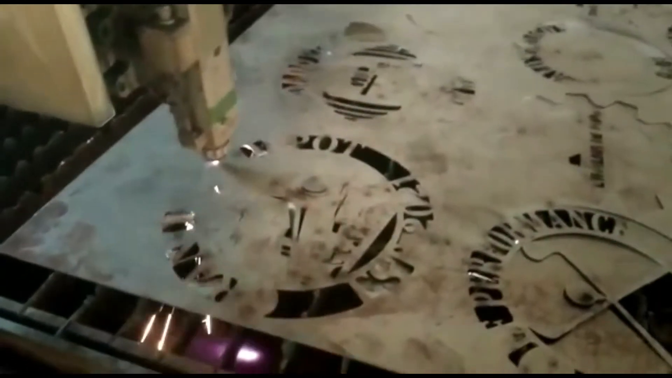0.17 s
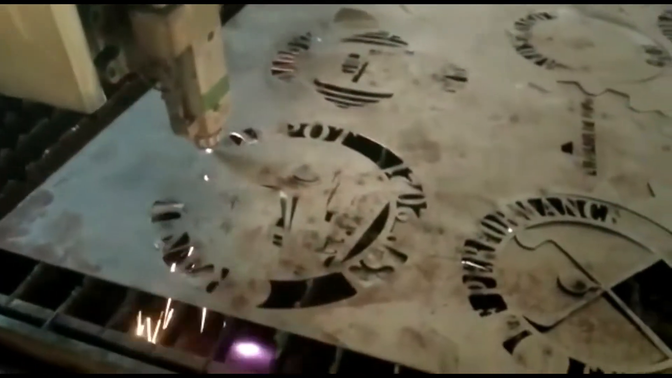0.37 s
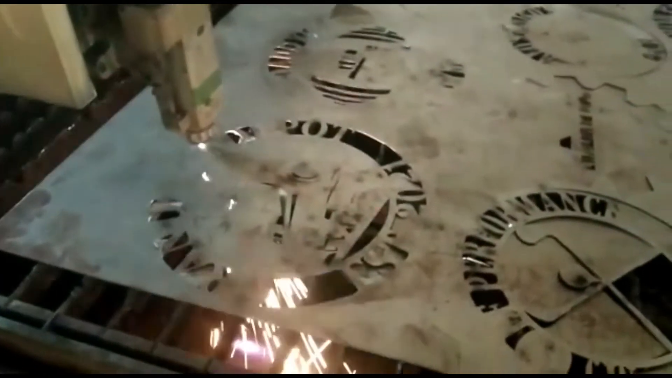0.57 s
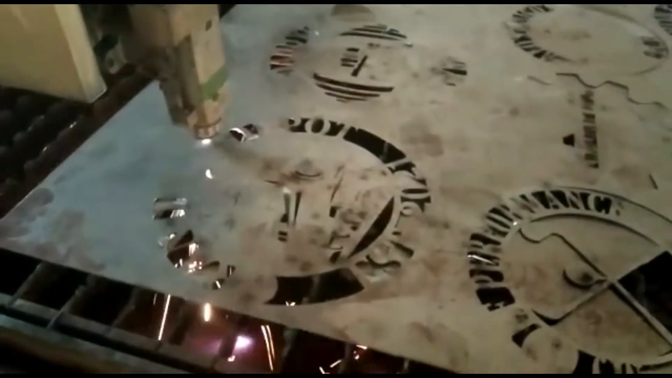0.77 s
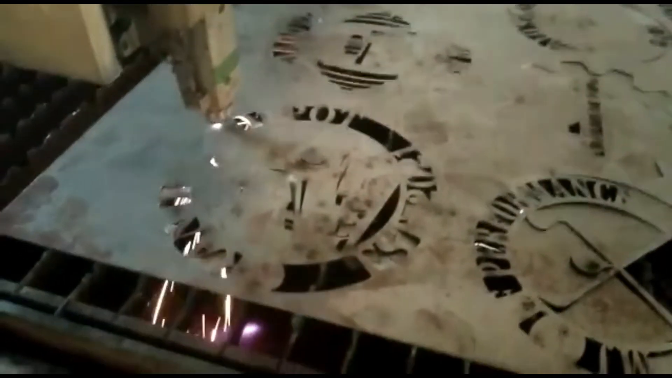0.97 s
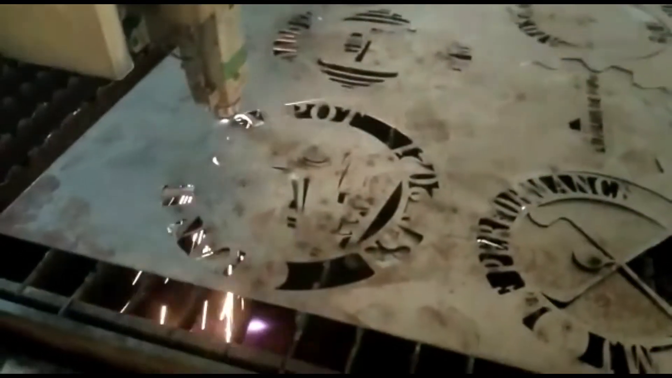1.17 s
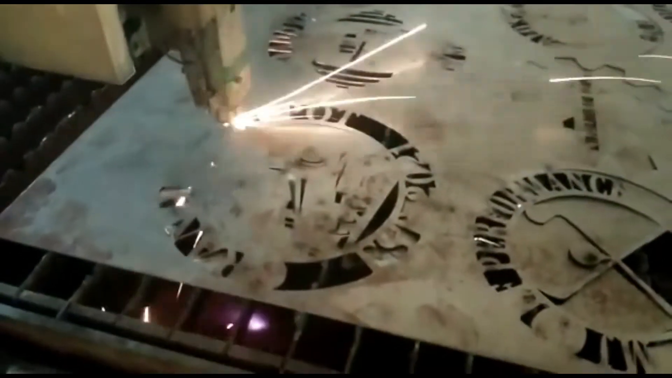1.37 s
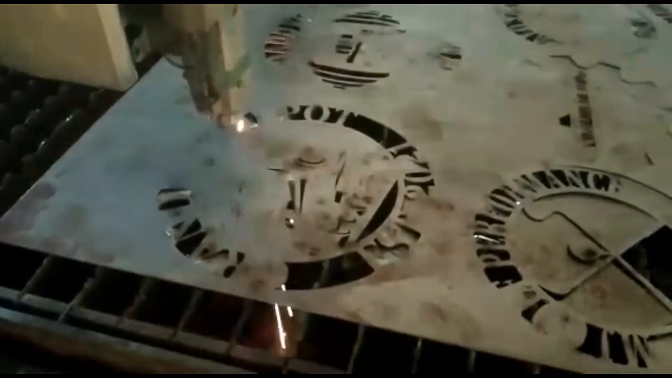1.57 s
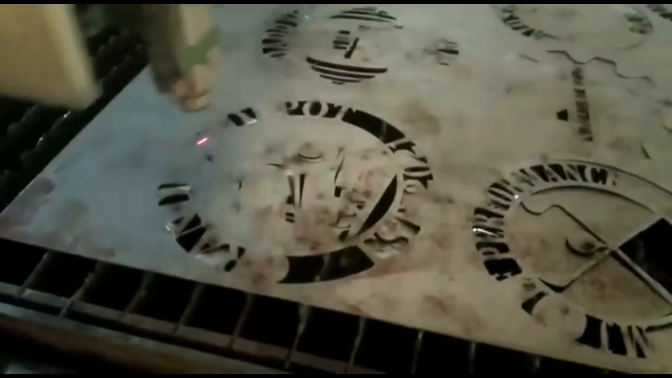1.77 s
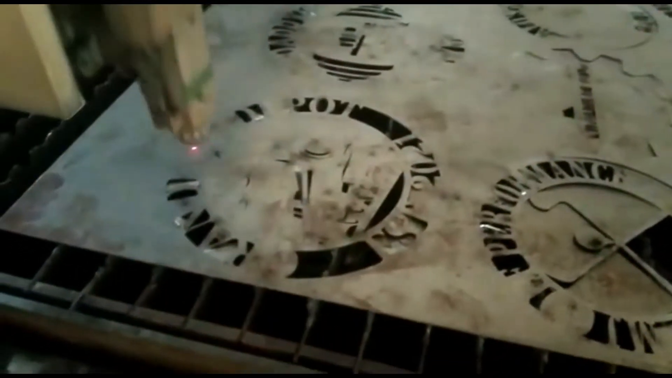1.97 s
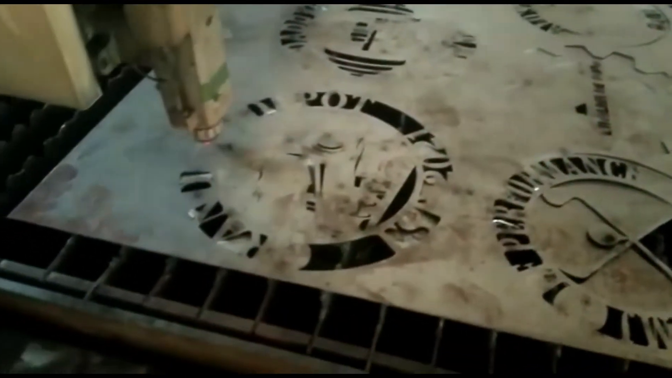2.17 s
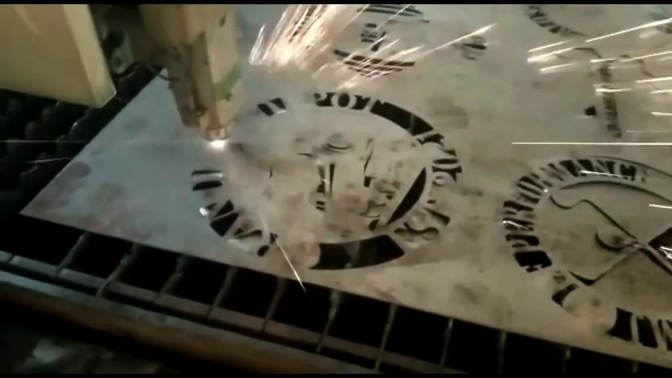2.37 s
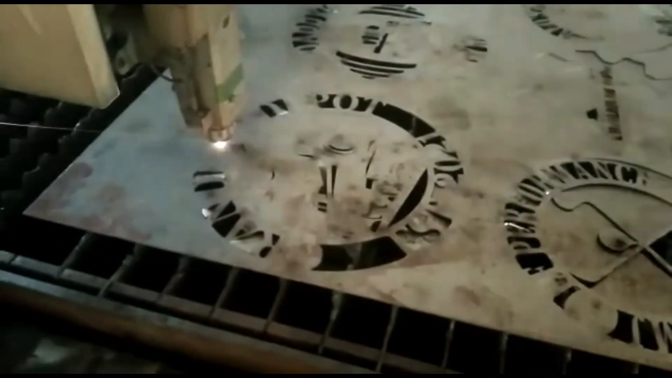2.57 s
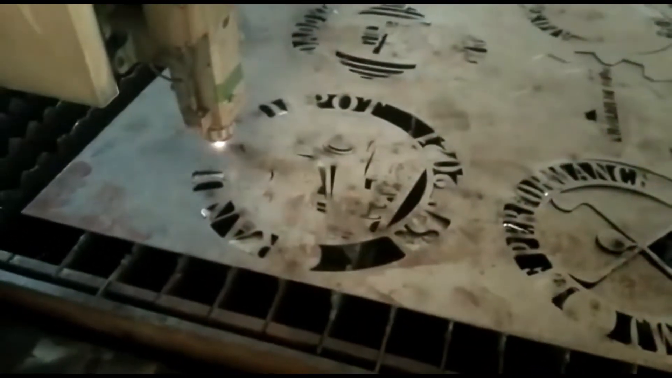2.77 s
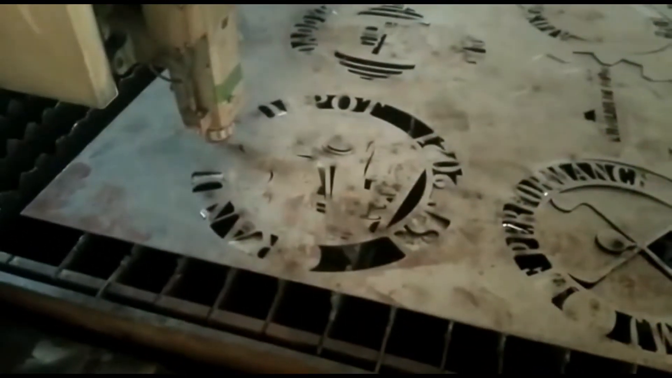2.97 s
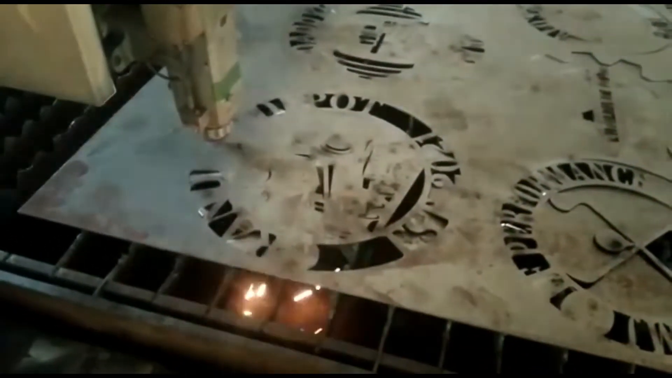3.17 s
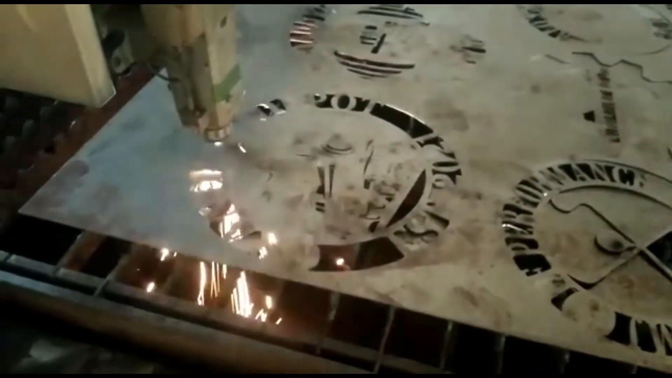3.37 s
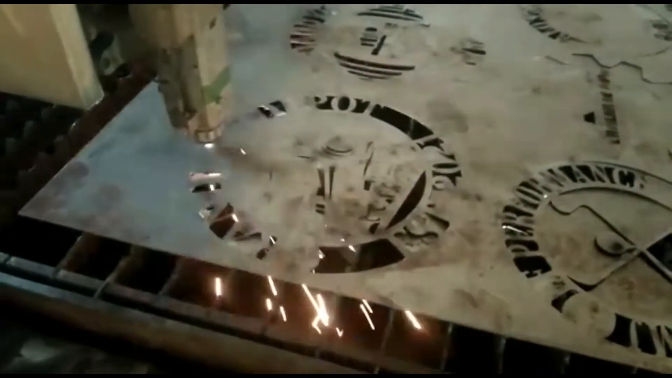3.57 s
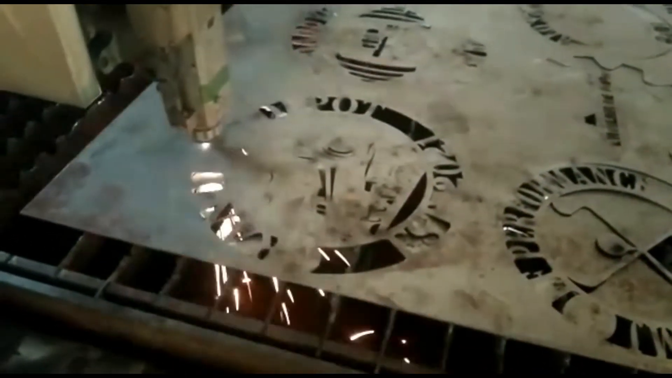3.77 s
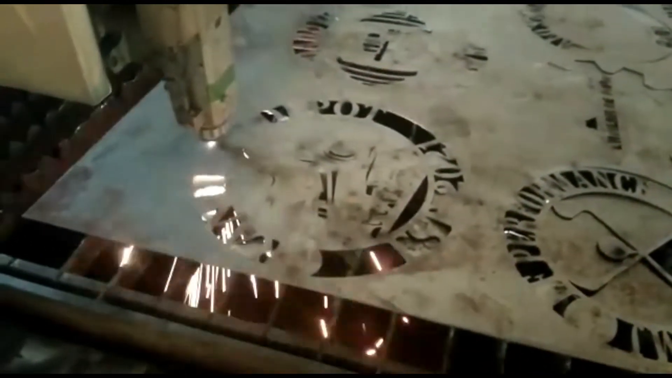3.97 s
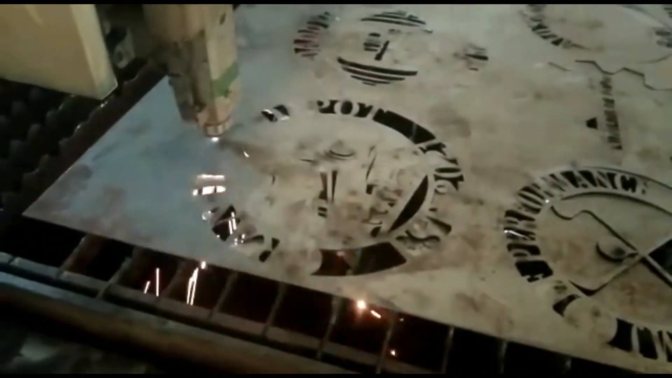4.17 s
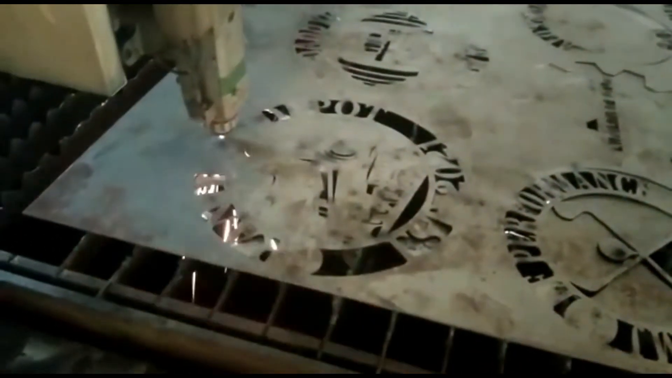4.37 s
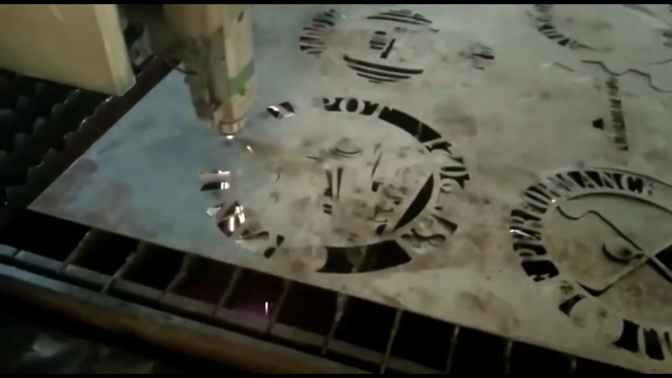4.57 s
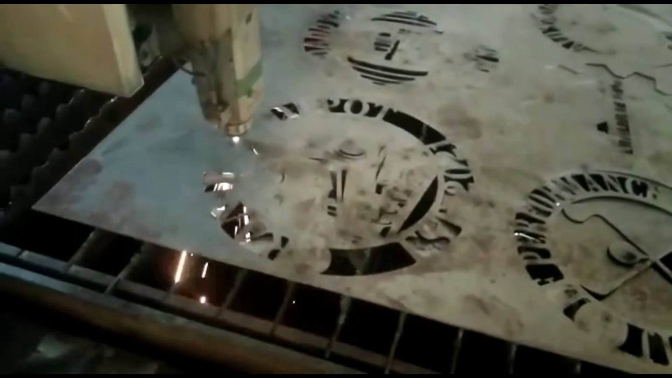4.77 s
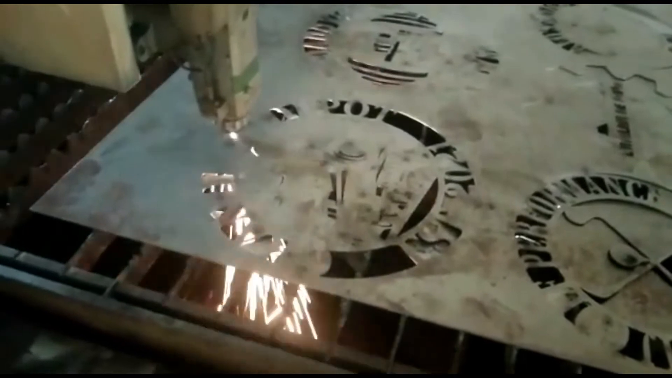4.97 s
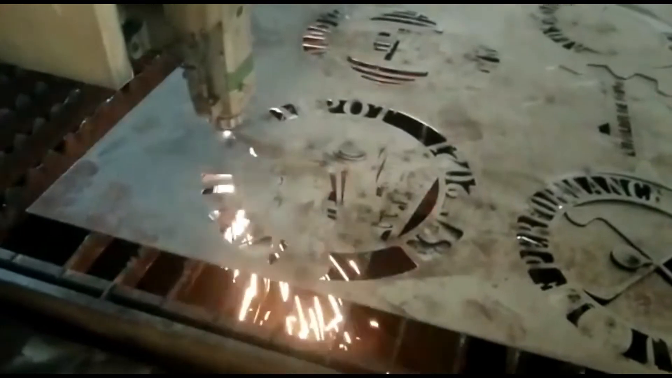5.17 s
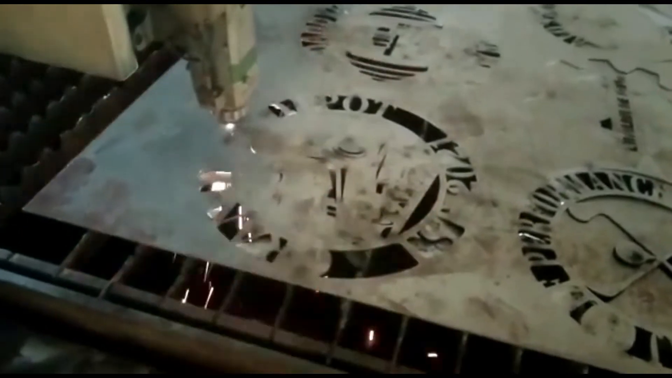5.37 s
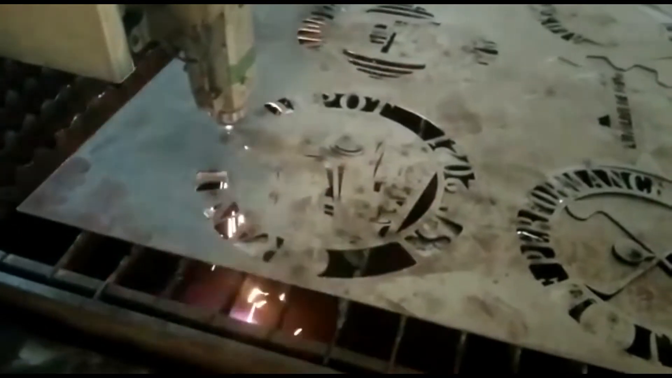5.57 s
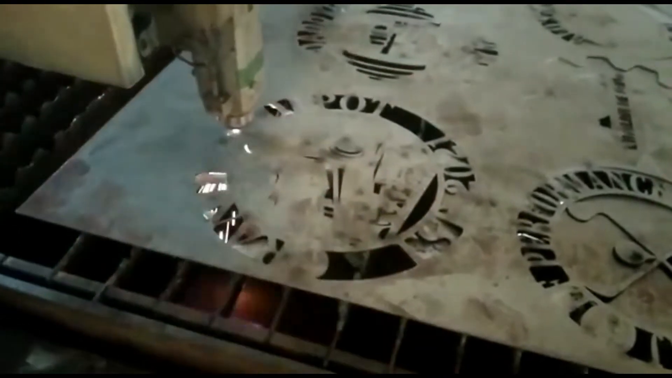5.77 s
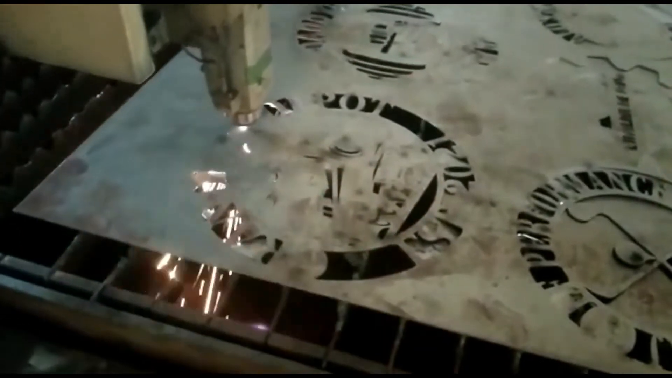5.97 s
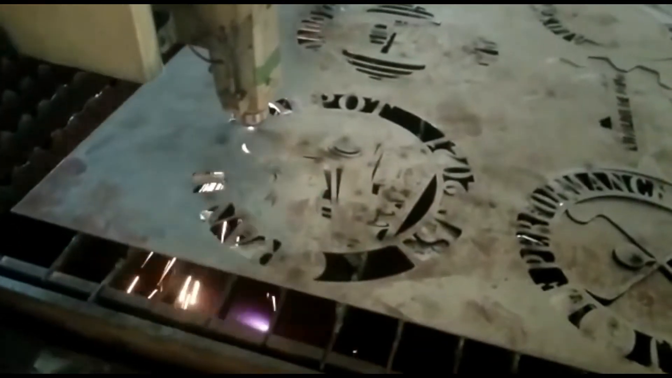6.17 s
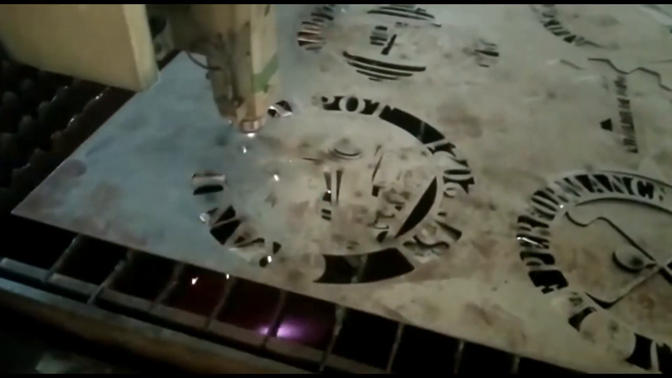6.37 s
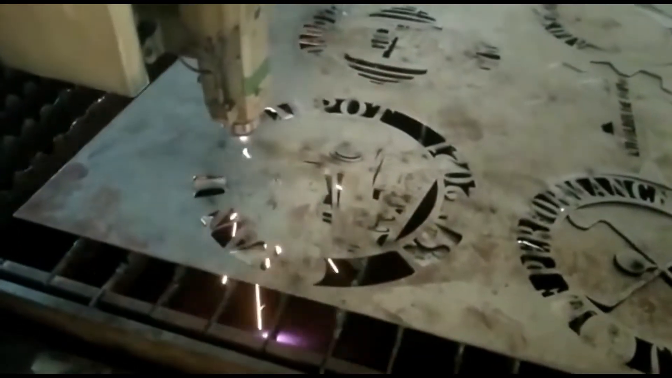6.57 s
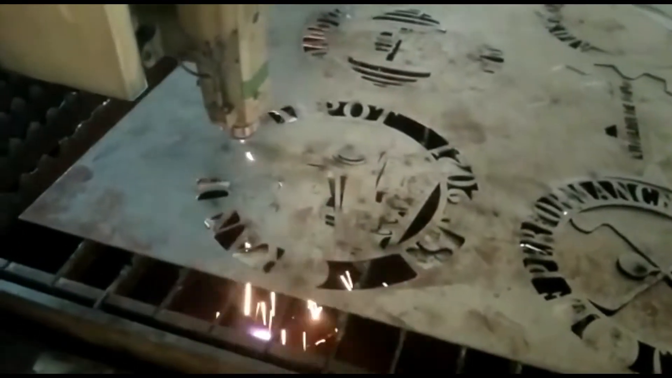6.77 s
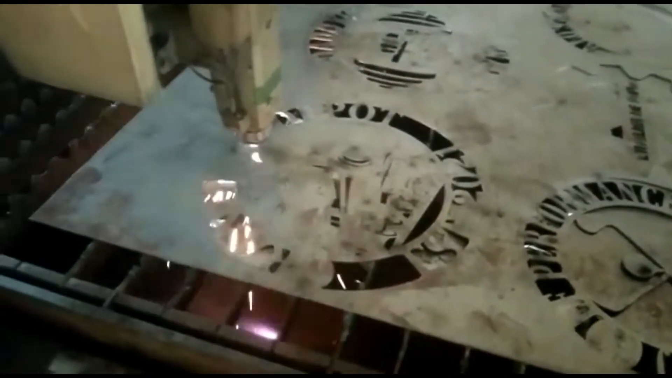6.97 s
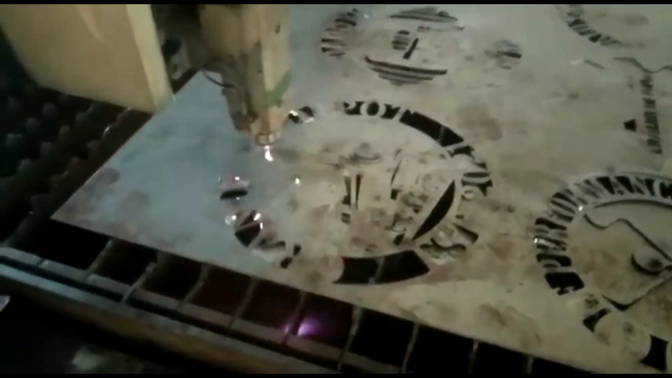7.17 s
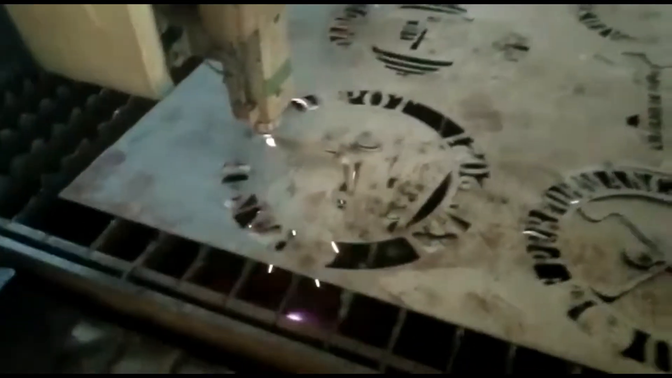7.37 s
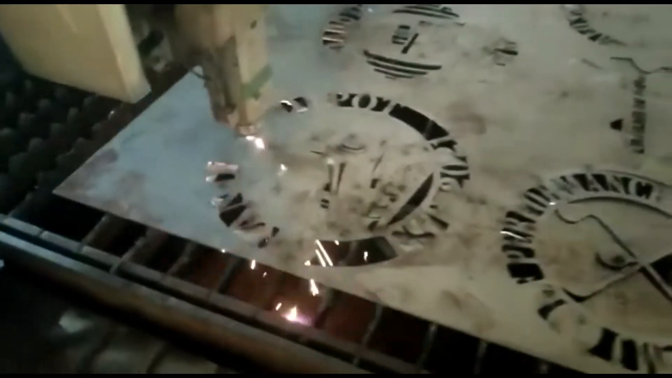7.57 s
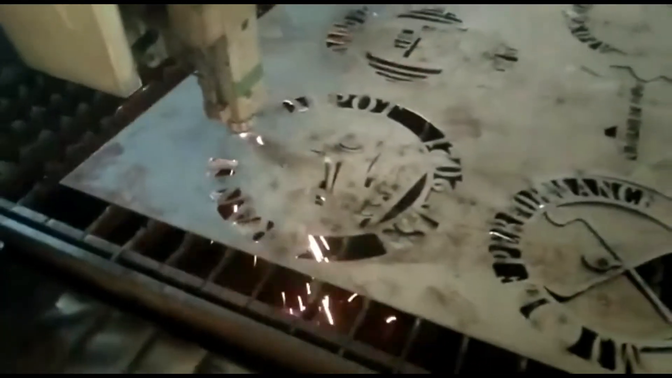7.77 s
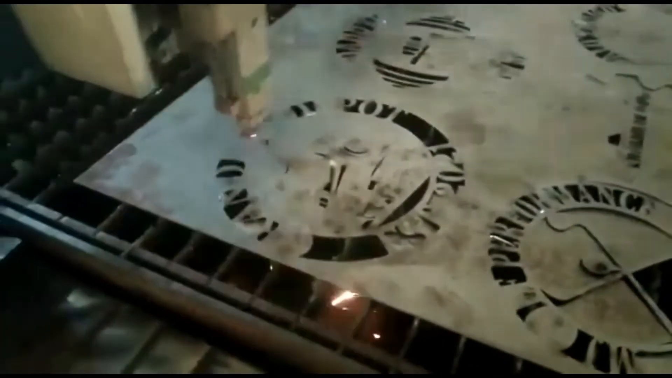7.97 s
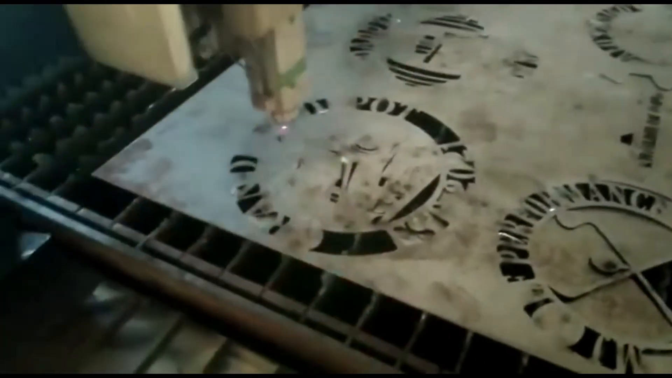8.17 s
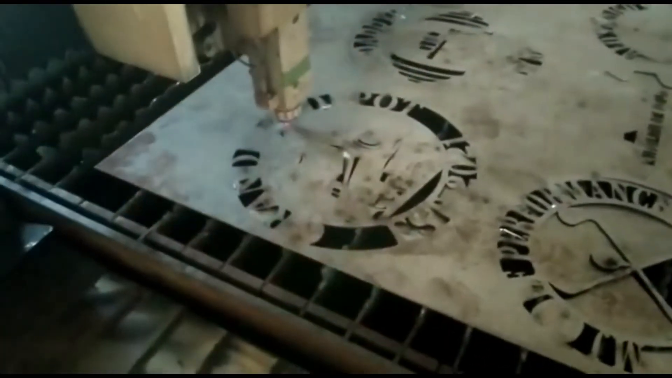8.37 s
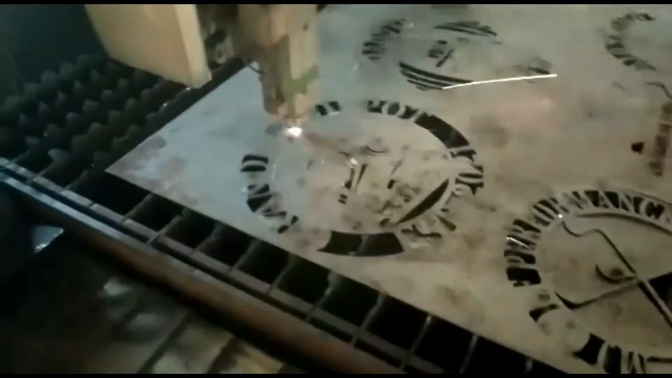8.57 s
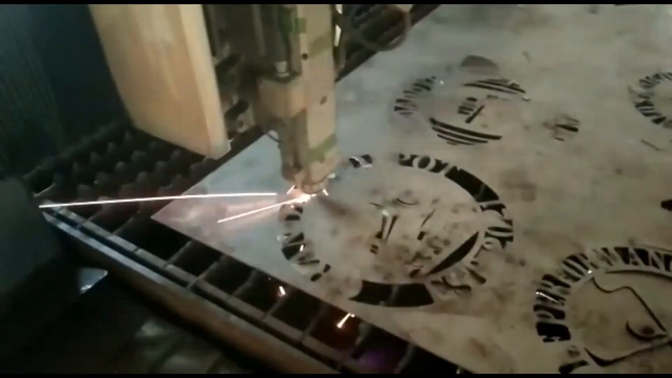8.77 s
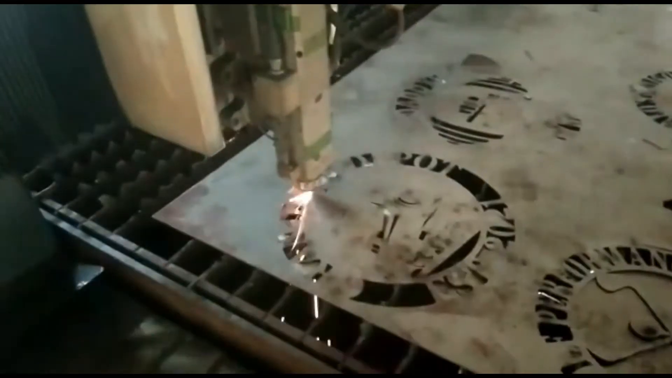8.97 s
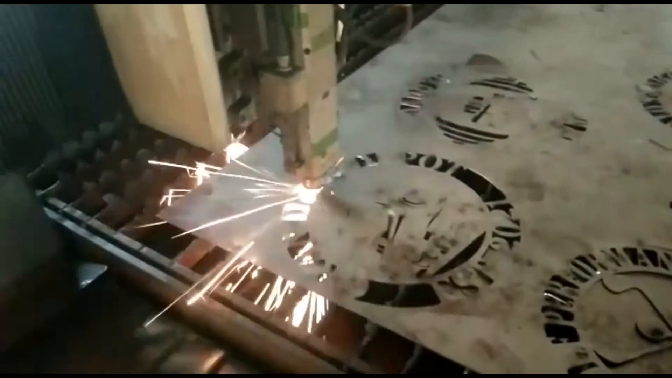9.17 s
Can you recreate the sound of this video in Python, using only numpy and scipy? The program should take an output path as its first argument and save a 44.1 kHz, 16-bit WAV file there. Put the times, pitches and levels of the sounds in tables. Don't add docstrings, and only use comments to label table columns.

```python
import sys
import numpy as np
from scipy import signal
from scipy.fft import rfft, irfft
from scipy.io import wavfile
from scipy.ndimage import uniform_filter1d

SR = 44100
rng = np.random.default_rng(int(sys.argv[2]) if len(sys.argv) > 2 else 0)


def volts_from_decibels(level):
    exponent = np.asarray(level, float) / 20
    return 10 ** exponent


def waveform_to_disk(signal):
    frames = np.transpose(np.atleast_2d(signal))
    scaled = np.clip(frames, -1, 1) * 32767
    samples = np.round(scaled).astype(np.int16)
    wavfile.write(sys.argv[1], SR, samples)


N = 406161

# t/s, gas splash on the sheet level/dB, kerf opening level/dB, # nozzle stand-off
# gap above the sheet level/dB
CUT = [(0, -24, 3.5, 2), (.9, -23, 4, 0.5), (1.7, -21, 3.5, 0), (2.15, -25, -1, 0), (3.3, -25.5, -1, -1),
       (3.7, -26, 1, 0.8), (4.2, -24.5, 1, 2.7), (5.3, -23.5, 1.5, 2.5), (6.05, -23, 1.5, 1.8),
       (6.4, -24.5, 0, 1.5), (6.98, -23.5, 1, 0.5), (7.2, -24.5, 4.5, -1.7), (7.62, -25, -1.5, -0.5),
       (8.05, -25.5, -1.5, 0), (8.45, -29, -2.5, -2), (8.72, -27, -1.5, -0.2), (8.8, -26.5, 1.5, 0.5),
       (9.21, -28, 3, -2.5)]
# t/s, length/s, build-up/s, level/dB
SURGES = [
    (.95, 0.31, .15, 1.5),
    (1.42, 0.4, 0.048, 3),
    (2.384, .14, 0.054, 1),
    (2.55, 0.28, .1, 1),
    (3.098, 0.38, 0.42, 2.5),
    (5.1, 0.15, .05, 0.7),
    (5.55, 0.29, 0.11, 1),
    (7.302, 0.283, 0.29, 6.5),
    (7.678, 0.25, .08, 2.5),
    (8.73, .6, .008, 8.5),
]
SURGE_DROP_S = 0.0067
# t/s, half width/s, level/dB
GLANCES = [
    (1.845, 0.048, 9.5),
    (1.98, 0.079, 9),
    (8.066, 0.035, 7),
    (8.125, 0.038, 8.5),
    (8.235, 0.042, 5),
]
CORE_FOLLOWS = (1.15, 0.01, 0.11, 0.44, 1.04)
ROAR_FOLLOWS = (1.12, -0.23, -0.83, 0.93, 0.38)
RUSH_FOLLOWS = (.1, 1.07, .01, 0.31, .3)
SHOULDER_FOLLOWS = (0.19, .05, .8, 0.59, 0.78)
FIZZ_FOLLOWS = (0.072, 0.088, 1, 0.1, 0.75)
SPLASH_MEAN_DB = -26.5

# f/Hz, level/dB per Hz
HISS = [(290, -52), (500, -26), (1390, -18.5), (1700, -18.5), (1930, -20), (2500, -18), (3240, -14),
        (4070, -12.5), (4440, -9.5), (6360, -1.5), (7450, -8), (8980, -22.5), (10800, -24.5),
        (12500, -30.5), (15500, -21)]
# f/Hz, width/Hz, level/dB
KERF_RESONANCES = [(2543, 210, 4), (3640, 200, 4), (4110, 160, 4.5), (5384, 350, 3.5), (7320, 290, 0.5),
                   (13500, 600, 3)]
# t/s, lower f/Hz, middle f/Hz, upper f/Hz
NOTCHES = [(0, 9440, 12300, 12600), (2.3, 9360, 12150, 12500), (4, 9300, 12000, 12700),
           (5.5, 9000, 11650, 12600), (6.5, 8800, 11600, 12400), (7.5, 9180, 11700, 12700),
           (8.7, 9000, 11800, 12800), (8.76, 9500, 11750, 12200), (9.21, 9650, 11600, 12100)]
RIDGE_RATIO = 0.712
TROUGH_RATIO = .845
# middle t/s, half length/s, f/Hz, level over the hiss/dB
WHISTLES = [
    (3.93, .08, 3510, 7),
    (5.22, .1, 3520, 5),
    (1.46, 0.33, 2580, 7),
    (4.6, .2, 2570, 4),
    (5.1, .06, 1830, 8.5),
    (3.7, .1, 1750, 7.5),
    (8.5, 0.2, 3620, 7),
]
WHISTLE_WIDTH_HZ = 60.

# t/s, length/s, buffeting level/dB, brightness level/dB
GUSTS = [(1.737, .012, -21.5, -23), (1.755, 0.0845, -18.5, -5), (1.851, 0.026, -21.5, -19.5),
         (1.977, 0.051, -18, -2), (2.003, .062, -19, 0), (2.075, .04, -33, -17), (2.445, 0.064, -41, -25),
         (2.71, .045, -42, -25), (8.59, .035, -43, -11), (8.73, .008, -43, -8), (8.079, .035, -23, -16.5),
         (8.116, 0.035, -17, -7.5), (8.161, 0.021, -23, -23), (8.204, 0.041, -17.5, -17.5)]
GUST_RISE_DB_S, GUST_FALL_DB_S = 894, 1095
DULL_EDGES = 0.44
PUSH = .45
EDDIES_PER_S = 170
# t/s, jump level/dB, push 1 or pull -1
POPS = [(1.7307, -10.5, -1), (1.7494, -11, -1), (1.7637, -7, -1), (1.742, -15, 1), (1.828, -7, 1),
        (1.8414, -3, -1), (1.8706, -13.5, 1), (1.9511, -12.5, 1), (1.9609, -5, 1), (1.9757, -3, 1),
        (1.9887, -15, 1), (2.0668, -6, 1), (2.4472, -21, 1), (2.4654, -20.5, -1), (2.716, -29.5, -1),
        (2.746, -26, 1), (8.0644, -5.5, 1), (8.0665, -2.5, -1), (8.0785, -23, 1), (8.0891, -7, -1),
        (8.1042, -3, -1), (8.1675, -8, -1), (8.174, -11, -1), (8.189, -10, -1), (8.2033, -12, 1),
        (8.2157, -12, -1), (8.228, -18, 1), (8.2385, -4, 1), (8.2472, -8, 1), (8.251, -9, 1)]
# f/Hz, level/dB
PORT = [(30, -4.5), (2000, 7), (4000, 12.5), (6500, 22), (8500, 14.5), (12200, 8), (15000, 25)]

# t/s, peak level/dB, f/Hz, length/s
THUMP = (.899, -33, 165, .026)
# f/Hz, level/dB per Hz
SHOP = [(15, -55), (25, -34), (69, -21.5), (83, -8.5), (102, -12), (134, -9.5), (195, -0.5), (227, -4.5),
        (619, -6.5), (900, -7.5), (1170, -34), (1980, -120)]
SHOP_DB, DRAUGHT_FOLLOWS = -48.5, 0.84
# f/Hz, relative level/dB
HUM = [(100, -64), (116, -66), (200, -69)]

# t/s, centre f/Hz
FILLS = [(.427, 7550), (.43, 11700), (.499, 7500), (.849, 14100), (1.127, 5700), (1.127, 11650),
         (2.891, 8950), (2.891, 11600), (2.988, 4700), (3.146, 5750), (3.542, 10350), (3.545, 6300),
         (3.59, 8250), (3.681, 12750), (3.751, 11000), (3.79, 7900), (3.798, 12000), (3.84, 5200),
         (3.843, 8950), (3.911, 7250), (3.912, 14100), (4.052, 10350), (4.301, 5800), (4.306, 12400),
         (5.139, 6400), (6.282, 8300), (6.699, 7600), (7.488, 4700), (7.489, 6300), (8.372, 14400)]
FILL_WIDTH_HZ = 1500
EDGE_HZ = 15510


def evened(x):
    return x / np.sqrt(np.mean(x ** 2) + 1e-20)


def read(points, hz):
    f, value = np.transpose(points)
    return np.interp(np.log(hz + 1), np.log(f + 1), value)


def bump(hz, lo_hz, hi_hz, soft=.08):
    rise = np.tanh(np.log((hz + 1) / lo_hz) / soft)
    fall = np.tanh(np.log(hi_hz / (hz + 1)) / soft)
    return (1 + rise) * (1 + fall) / 4


def dip(hz, centre_hz, width_hz):
    return np.exp(-((hz - centre_hz) / width_hz) ** 2)


def noise(field_db, size):
    a, b = rng.standard_normal(field_db.shape + (2,)).T
    spectra = a + 1j * b
    overlap = size * 3 // 4
    flat = signal.istft(spectra, nperseg=size, noverlap=overlap)[1]
    shaped = signal.istft(spectra * volts_from_decibels(field_db.T), nperseg=size, noverlap=overlap)[1]
    return shaped[:N] / flat.std()


def patches(shape, long, wide):
    stretched = uniform_filter1d(rng.standard_normal(shape), long, 0)
    return evened(uniform_filter1d(stretched, wide, 1))


def flow(t):
    s, splash_db, open_db, gap_db = np.transpose(CUT)
    surge_db = np.zeros(len(t))
    for at, length, rise, db in SURGES:
        ramp = np.minimum((t - at) / rise, (at + length - t) / SURGE_DROP_S)
        surge_db += db * np.clip(ramp, 0, 1)
    glance_db = sum(db * np.exp(-((t - at) / width) ** 2) for at, width, db in GLANCES)
    splash_db = np.interp(t, s, splash_db) - SPLASH_MEAN_DB
    return np.array([splash_db, np.interp(t, s, open_db), np.interp(t, s, gap_db), surge_db, glance_db])


def gas():
    hz = np.fft.rfftfreq(512, 1 / SR)
    t = np.arange(N // 128 + 5) * 128 / SR
    follows = np.array([CORE_FOLLOWS, ROAR_FOLLOWS, RUSH_FOLLOWS, SHOULDER_FOLLOWS, FIZZ_FOLLOWS])
    core_db, *others = (follows @ flow(t))[:, :, None]
    roar_db, rush_db, shoulder_db, fizz_db = others - core_db

    shape_db = read(HISS, hz) + sum(db * dip(hz, f, width) for f, width, db in KERF_RESONANCES)
    main_power = np.mean(volts_from_decibels(2 * shape_db) * (hz > 5000) * (hz < 7600))
    field = shape_db - 10 * np.log10(main_power) + SPLASH_MEAN_DB + core_db
    field = field + roar_db * bump(hz, 2500, 6460) + rush_db * bump(hz, 100, 2580)
    field = field + shoulder_db * bump(hz, 8100, 10000) + fizz_db * bump(hz, 12000, 20000)
    field = field - 16. * bump(hz, 1, 710)

    s, *tracks = np.transpose(NOTCHES)
    low_hz, middle_hz, high_hz = (np.interp(t, s, track)[:, None] for track in tracks)
    field = field + 4.2 * dip(hz, RIDGE_RATIO * low_hz, 360.)
    field = field - 3.5 * dip(hz, TROUGH_RATIO * low_hz, 330.)
    field = field - 5.5 * dip(hz, low_hz, 180.)
    field = field - 6.0 * dip(hz, middle_hz, 230.) - 4.5 * dip(hz, high_hz, 200.)

    for s, half, f, db in WHISTLES:
        swell = np.exp(-((t[:, None] - s) / half) ** 4)
        field = field + db * swell * dip(hz, f, WHISTLE_WIDTH_HZ)

    combs = patches(field.shape, long=330, wide=2)
    field = field + 1.5 * (combs - uniform_filter1d(combs, size=12, axis=1))
    field = field + .5 * patches(field.shape, long=26, wide=8)
    field = field + .5 * patches(field.shape, long=5, wide=120)
    return noise(field, size=512)


def jolt(x, leak_hz, edge_hz, vent_hz=70.):
    rounded = signal.lfilter(*signal.butter(1, edge_hz, fs=SR), x)
    relaxed = signal.lfilter([1], [1, -np.exp(-2 * np.pi * leak_hz / SR)], rounded)
    return signal.sosfilt(signal.butter(3, vent_hz, "high", fs=SR, output="sos"), relaxed)


def coloured(x, points):
    hz = np.fft.rfftfreq(2048, 1 / SR)
    log_gain = np.log(volts_from_decibels(read(points, hz)))
    circle = np.concatenate([log_gain, log_gain[-2:0:-1]])
    response = np.exp(circle - 1j * signal.hilbert(circle).imag)
    return signal.oaconvolve(x, np.fft.ifft(response).real)[:len(x)]


def gusts():
    t = np.arange(N) / SR
    level, sharp = np.zeros(N), np.zeros(N)
    for s, length, level_db, bright_db in GUSTS:
        before_db = (s - t) * GUST_RISE_DB_S
        after_db = (t - s - length) * GUST_FALL_DB_S
        off_db = np.maximum(np.maximum(before_db, after_db), 0)
        gust = volts_from_decibels(level_db - np.minimum(off_db, 200))
        bright = volts_from_decibels(bright_db + 7.5) * (gust / volts_from_decibels(level_db)) ** DULL_EDGES
        sharp = np.where(gust > level, bright, sharp)
        level = np.maximum(gust, level)
    return level, np.clip(sharp, 0, 1)


def buffeting():
    level, share = gusts()
    size = volts_from_decibels(3.0 * np.minimum(rng.exponential(1, N), 2.5)) * rng.choice([-1., 1.], N)
    jumps = jolt(size * (rng.random(N) < 1500 / SR), leak_hz=500., edge_hz=2600.)
    push = jolt(uniform_filter1d(rng.standard_normal(N), size=40), leak_hz=90., edge_hz=130.)
    crackle = volts_from_decibels(-1.0) * share * evened(jumps)
    sway = PUSH * np.sqrt(1 - share ** 2) * evened(push)
    dense = level * (crackle + sway)

    single = level * np.sqrt(share) * size * (rng.random(N) < EDDIES_PER_S / SR)
    s, jump_db, sense = np.transpose(POPS)
    at = np.round((s - .0002) * SR).astype(int)
    single[at] = volts_from_decibels(jump_db - 3.0) * np.sign(sense)
    return coloured(dense + jolt(single, leak_hz=60., edge_hz=1700.), PORT)


def thump():
    s, peak_db, hz, length = THUMP
    u = np.clip((np.arange(N) / SR - s) / length, 0, 1)
    return volts_from_decibels(peak_db) * np.sin(np.pi * u) * np.sin(2 * np.pi * hz * length * u)


def mains_hum():
    t = np.arange(N) / SR
    waver = evened(uniform_filter1d(rng.standard_normal((len(HUM), N)), 6000, 1))
    hum = np.zeros(N)
    for (f, db), w in zip(HUM, waver):
        hum += volts_from_decibels(db + 6.5 + 3.7 * w) * np.sin(2 * np.pi * f * t + 1.43 * w)
    return hum


def shop():
    hz = np.fft.rfftfreq(2048, 1 / SR)
    field = read(SHOP, hz) + 1.4 * patches((N // 512 + 5, len(hz)), long=40, wide=2)
    s, _, open_db, _ = np.transpose(CUT)
    frame_t = np.arange(len(field)) * 512 / SR
    draught_db = DRAUGHT_FOLLOWS * np.interp(frame_t, s, open_db)[:, None]
    field = field + draught_db * bump(hz, 290, 3000)
    return volts_from_decibels(SHOP_DB) * evened(noise(field, size=2048)) + mains_hum()


def scene():
    return np.tile(gas() + buffeting() + thump() + shop(), (2, 1))


def fills(x):
    side, hz = np.zeros(N), np.fft.rfftfreq(2048, 1 / SR)
    for s, centre_hz in FILLS:
        at = round(s * SR) - 1024
        earlier = rfft(x[at - 4096:at - 2048])
        band = (abs(hz - centre_hz) < FILL_WIDTH_HZ / 2) * (hz > 4220)
        side[at:at + 2048] += irfft(earlier * band) * signal.windows.hann(2048)
    return volts_from_decibels(-.6) * side


def top_cut(x):
    return signal.sosfilt(signal.butter(12, 16520, fs=SR, output="sos"), x)


def record(dry):
    soft = np.tanh(dry[0] / 1.187)
    low_pass = signal.firwin(1023, EDGE_HZ, window=("kaiser", 9), fs=SR)
    soft = signal.oaconvolve(soft, low_pass, "same")
    side = fills(soft)
    return top_cut(np.array([soft + side, soft - side]))


dry = scene()
out = record(dry)
waveform_to_disk(out)
```